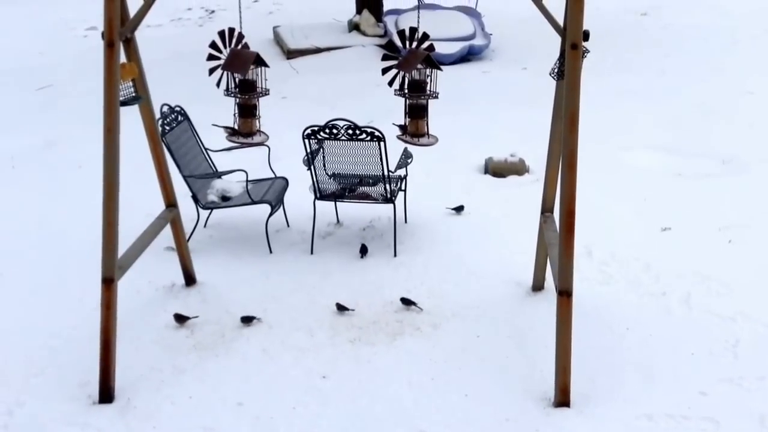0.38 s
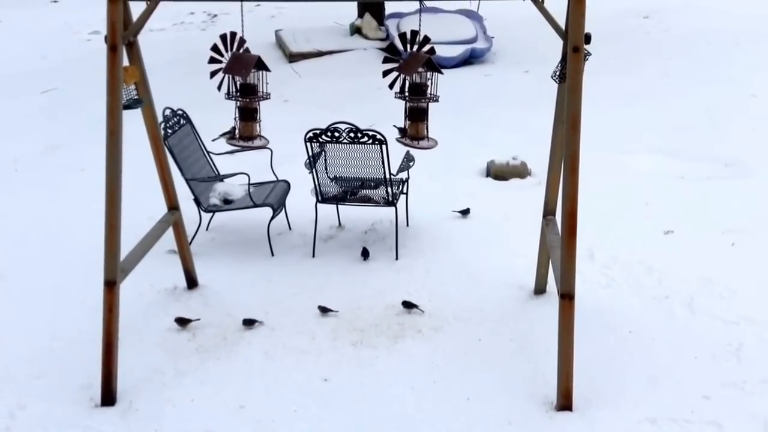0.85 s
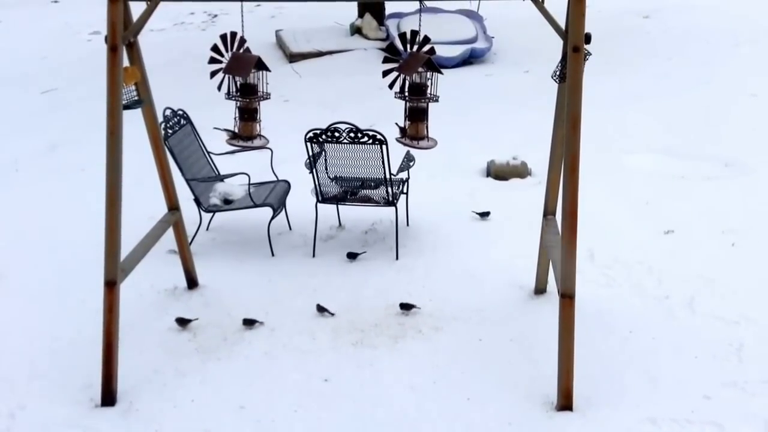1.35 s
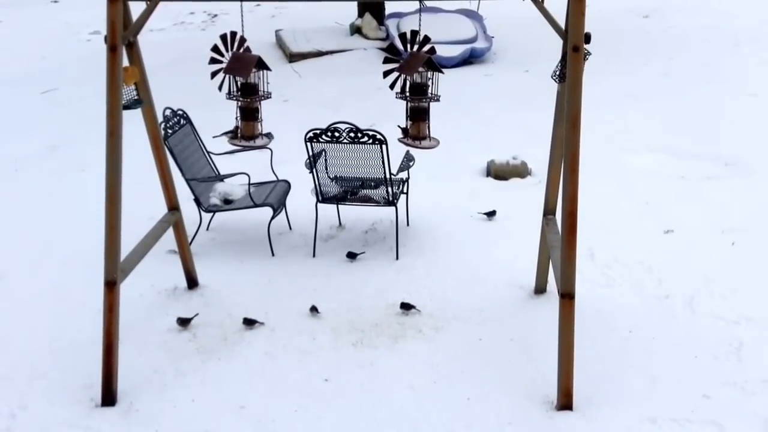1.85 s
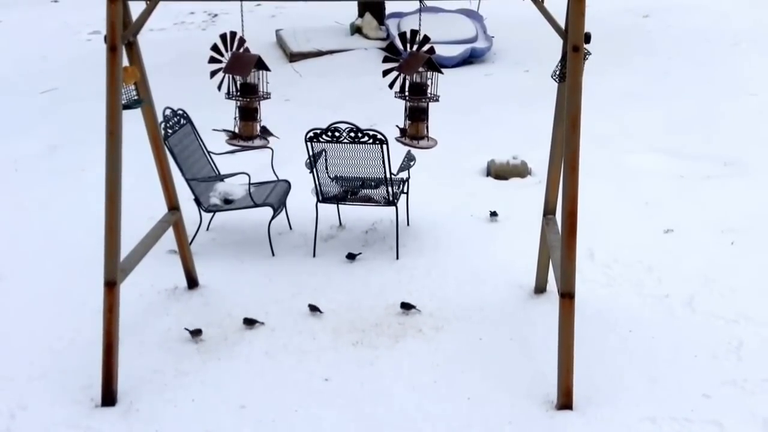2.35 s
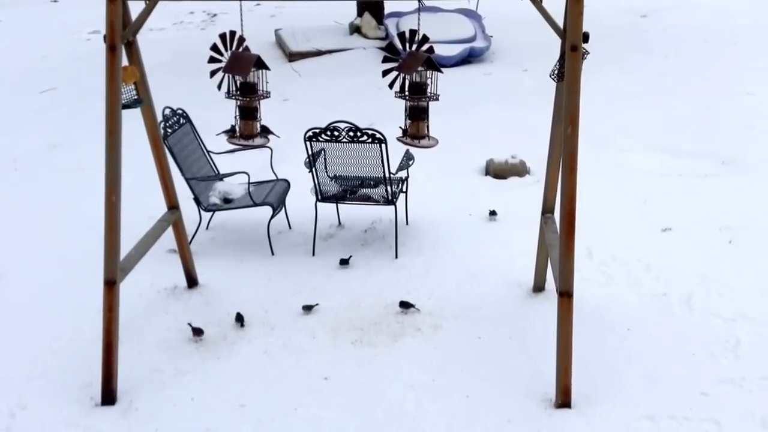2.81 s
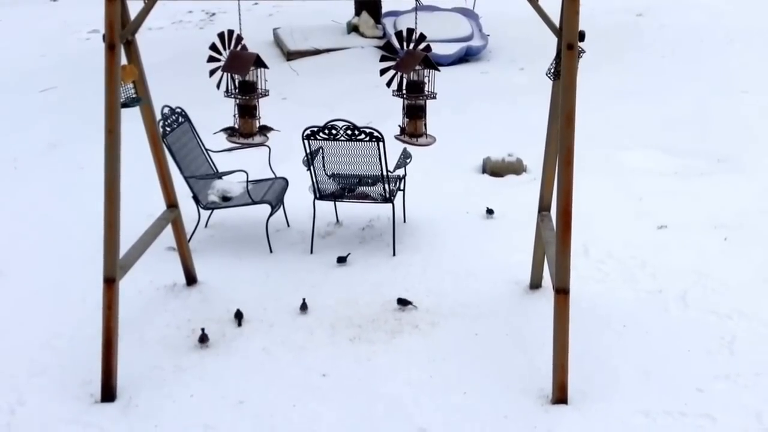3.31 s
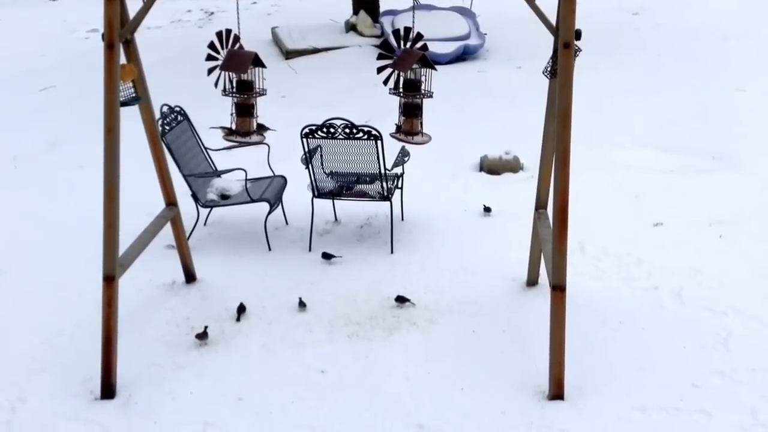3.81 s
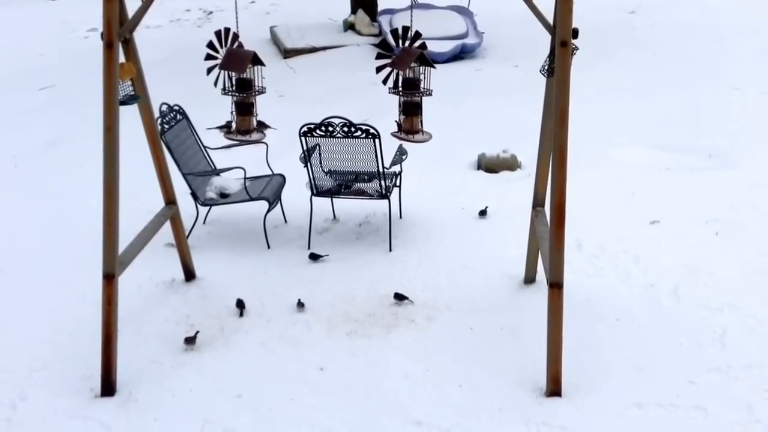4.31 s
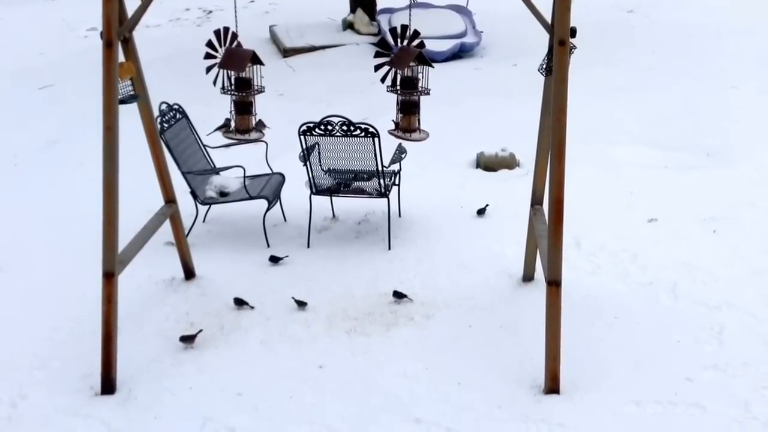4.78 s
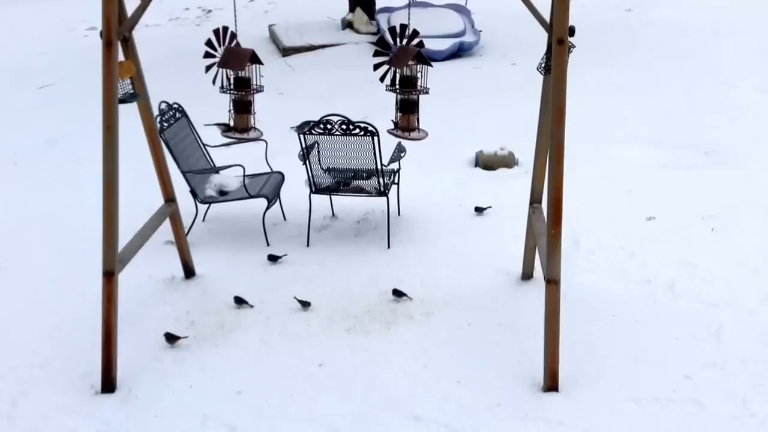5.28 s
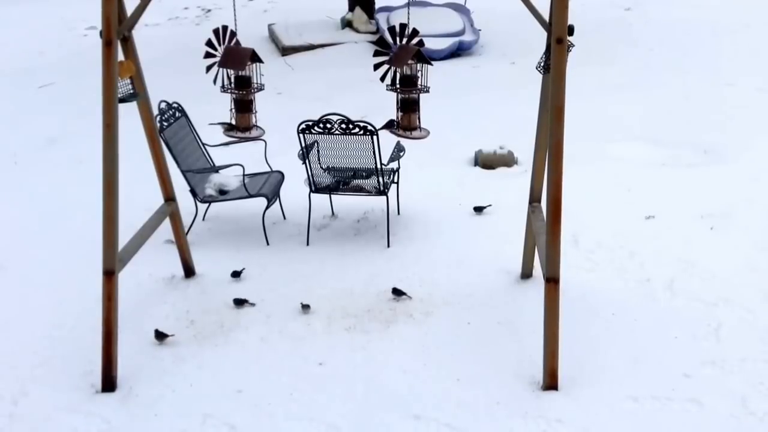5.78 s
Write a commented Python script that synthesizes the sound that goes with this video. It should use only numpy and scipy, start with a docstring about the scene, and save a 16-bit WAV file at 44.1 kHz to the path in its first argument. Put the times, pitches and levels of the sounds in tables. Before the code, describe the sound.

Outdoors in a quiet snowy yard, the tail of a bird call is heard at 0 seconds, along with a very faint fading hum. A hoarse, fowl-like bird then repeats a two-part call about every 0.7 seconds: short clucks near 0.3, 1.0, 1.6, 2.3, 3.1, 3.7, 4.4 and 5.1, each followed by a squawk of roughly a quarter second. The squawk opens low, swells into a nasal rasp and breaks into a higher register, with a dull, faint echo. A weaker cluck comes near 5.8. Another bird chirps sharply at 0.96, more softly at 4.55 and barely at 5.8; two distant soft clucks fall around 4.9. Dull bumps and small ticks close to the microphone cluster between 0.85 and 1.9, returning around 4.5 and 5.7. Faint steady hiss and low rumble continue throughout, the deepest rumble easing early.

```python
"""Fowl calling in a snowy yard

A fowl repeats a two-part call: a short cluck, then a long hoarse squawk that opens low, swells and roughens,
and breaks into a higher register. A second bird chirps three times and another clucks far off.
The voices are stacks of wavering partials, shaped by a throat colour and mixed with breath noise.
Filtered noise makes the low rumble and hiss; fading tones and noise make soft bumps close to the microphone."""
import sys
import numpy as np
from scipy import signal
from scipy.io import wavfile

SR = 44100
rng = np.random.default_rng(int(sys.argv[2]) if len(sys.argv) > 2 else 0)


def digitize_waveform(pressure):
    """Quantize a signal to 16-bit integers and store it at the path in sys.argv[1].

    Rows of a 2-D input are taken as channels; values are limited to [-1, 1].
    """
    field = np.atleast_2d(pressure).T
    bounded = np.clip(field, -1, 1)
    quanta = np.round(bounded * 32767).astype(np.int16)
    wavfile.write(sys.argv[1], SR, quanta)


def decibels_to_gain(level_db):
    """Convert a level in decibels to a linear amplitude gain (20 dB per decade)."""
    exponent = np.asarray(level_db, float) / 20
    return 10 ** exponent


N = 260190   # length of the scene in samples


def rms_one(x):
    """Scales a sound to an average (rms) level of 1."""
    return x / np.sqrt(np.mean(x ** 2) + 1e-20)


def at_hz(points, hz):
    """Reads a curve of (pitch_hz, level_db) points at any pitch, on a logarithmic pitch scale."""
    points_hz, points_db = np.transpose(points)
    return np.interp(np.log(hz), np.log(points_hz), points_db)


def drift(rate_hz, size):
    """Slow random wandering with a spread of 1: noise smoothed twice by a one-pole low-pass."""
    r = np.exp(-2 * np.pi * rate_hz / SR)
    lead = int(SR / rate_hz)   # the filter runs in first, and this part is cut off
    noise = rng.standard_normal(size + lead)
    smooth = signal.lfilter([1], [1, -2 * r, r * r], noise)
    return rms_one(smooth[lead:])


def resonance(x, hz, width_hz):
    """Lets a narrow band ring: a two-pole resonator."""
    r = np.exp(-np.pi * width_hz / SR)
    return signal.lfilter([1, 0, -1], [1, -2 * r * np.cos(2 * np.pi * hz / SR), r * r], x)


def band_pass(x, low_hz, high_hz):
    """Keeps the sound between two pitches."""
    return signal.sosfilt(signal.butter(2, [low_hz, high_hz], "band", fs=SR, output="sos"), x)


def rumble():
    """A deep, dull rumble: low noise that fades early on to a steady, slightly wandering level."""
    start_db, steady_db, fade_s = -75.5, -91.5, 0.38
    noise = band_pass(rng.standard_normal(N), 60, 98)
    settling = np.exp(-np.arange(N) / SR / fade_s)
    level_db = steady_db + (start_db - steady_db) * settling + 1.6 * drift(0.77, N)
    return decibels_to_gain(level_db) * rms_one(noise)


# tone colour of the yard's noise, before it is set to its overall level: (pitch_hz, relative level_db per Hz)
YARD_COLOUR = [(18, -62), (30, -46), (81, -39), (111, -41), (126, 0), (173, -12.5), (202, -8), (243, 20),
               (323, -49), (504, -8), (1080, -3), (1590, -10), (2070, -13.5), (2900, -13), (15400, -48)]
# narrow bands that ring faintly and steadily in the background: (pitch_hz, width_hz, level_db)
HISS_BANDS = [(146, 5.3, -74), (205.8, 18.4, -69), (242, 3.9, -72.5), (1442, 29, -67.5), (1605.4, 20, -68)]


def yard():
    """Rumble and hiss in third-octave bands that each flicker a little, a few narrow bands and a faint tone."""
    noise = np.zeros(N)
    edges_hz = 30 * 2 ** np.arange(0, 9.1, 1 / 3)
    white = rng.standard_normal((2, N))
    for k, (low_hz, high_hz) in enumerate(zip(edges_hz, edges_hz[1:])):
        band = band_pass(white[k % 2], low_hz, high_hz)   # neighbours use different noise
        level_db = at_hz(YARD_COLOUR, np.sqrt(low_hz * high_hz)) + 1.3 * drift(5, N)
        noise += decibels_to_gain(level_db) * band
    out = decibels_to_gain(-61 + 0.31 * drift(0.92, N)) * rms_one(noise)
    for hz, width_hz, level_db in HISS_BANDS:
        hiss = rms_one(resonance(rng.standard_normal(N), hz, width_hz))
        out += decibels_to_gain(level_db + 2.7 * drift(3.85, N)) * hiss
    return out + far_hum()


def far_hum():
    """A faint far tone that dies away: a sine losing a steady number of dB each second."""
    start_db, fade_db_per_s, end_s = -68, 15, 0.55
    t = np.arange(N) / SR
    tone = np.sin(2 * np.pi * 506 * t) * (t < end_s)
    return np.sqrt(2) * decibels_to_gain(start_db - fade_db_per_s * t) * tone


# soft thumps, levels before the rise and fade: (start_s, thump level_db, pitch_hz, rustle level_db)
THUMPS = [(0.857, -46.5, 159, -53), (0.888, -54, 174, -59), (1.164, -45.5, 159, -61),
          (1.408, -51.5, 157.5, -63), (1.693, -46.5, 161, -55), (1.891, -48.5, 169, -70),
          (4.45, -49, 167, -49), (4.658, -51, 167.1, -49.5), (5.747, -46.5, 179, -56.5)]
# dry ticks, levels before the fade: (start_s, level_db, pitch_hz)
DRY_TICKS = [(0.849, -53.5, 4500), (0.861, -69, 6000), (1.152, -77, 7000), (1.824, -76, 10000),
             (4.584, -67, 3400), (5.036, -73, 8000), (5.558, -74, 9000)]


def bumps():
    """Soft low thumps, each a fading tone with a rustle of noise, and dry ticks of ringing noise."""
    out = np.zeros(N + SR)
    t = np.arange(SR // 5) / SR
    for start_s, thump_db, hz, rustle_db in THUMPS:
        thump = decibels_to_gain(thump_db) * np.sin(2 * np.pi * hz * t)
        rustle = decibels_to_gain(rustle_db) * drift(1390, len(t))
        envelope = decibels_to_gain(-60 * t / 0.14) * (1 - np.exp(-t / 0.0017))   # falls 60 dB in 0.14 s
        out[round(start_s * SR):][:len(t)] += envelope * (thump + rustle)
    for start_s, level_db, hz in DRY_TICKS:
        crack = rms_one(resonance(rng.standard_normal(len(t)), hz, width_hz=3230))
        out[round(start_s * SR):][:len(t)] += decibels_to_gain(level_db - 60 * t / 0.048) * crack
    return out[:N]


def yard_echo(x):
    """Walls and trees send back a dull, scattered tail: fading noise, low-passed and convolved with the sound."""
    t60_s, level_db, cut_hz = 0.84, -24.5, 6900
    t = np.arange(SR) / SR
    tail = rng.standard_normal(SR) * decibels_to_gain(-60 * t / t60_s) * (t > .012)
    tail = signal.sosfilt(signal.butter(2, cut_hz, fs=SR, output="sos"), tail)
    tail /= np.sqrt(np.sum(tail ** 2))
    return decibels_to_gain(level_db) * signal.fftconvolve(x, tail)[:N]


def stack(f0, order, throat, stretch, jitter, uneven, breath_db):
    """Partials of a wavering pitch through the throat: the strongest one, then low, middle and top groups."""
    size = len(f0)
    waver = jitter * (1 + 3 * uneven) * drift(94, size)
    phase = np.cumsum(2 * np.pi * f0 * (1 + waver) / SR)
    k = np.arange(1, int(15000 / f0.max()) + 1)[:, None]
    centre_hz = k[:, 0] * f0.mean()
    low, top = centre_hz < 2100, centre_hz >= 6400
    middle = ~low & ~top
    low[order - 1] = False   # the strongest partial is kept apart
    # the stretch moves the resonances of the top group only
    gain = decibels_to_gain(at_hz(throat, k * f0 / np.where(top[:, None], stretch, 1)))
    # each partial swells and breaks up on its own
    wobble = np.array([drift(44.96, size) for _ in k])
    tones = np.sin(k * phase + rng.uniform(0, 2 * np.pi, k.shape))
    tones *= np.sqrt(1 - uneven ** 2) + uneven * wobble
    # breath noise rides on every partial and fills the gaps between them, more so high up
    breath = decibels_to_gain(breath_db + 2.6 * np.log2(k / order)) * np.array([drift(200, size) for _ in k])
    breath *= np.cos(k * phase + rng.uniform(0, 2.7, k.shape))
    partials = gain * (tones + breath)
    strongest = (1 + .45 * uneven * wobble[order - 1]) * np.sin(order * phase)
    low_sum, middle_sum, top_sum = [partials[group].sum(axis=0) for group in (low, middle, top)]
    return strongest, low_sum, rms_one(middle_sum), rms_one(top_sum)


# throat colour of the rasp: (pitch_hz, level_db)
RASP_COLOUR = [(400, -46.5), (800, -27), (1000, -32.5), (1400, -3), (1800, -10), (2200, -15), (2600, -33),
               (3300, -15), (4000, -30), (5000, -25.5), (5800, -26.5), (6300, -74), (7000, -31.5),
               (8200, -40.5), (10000, -39), (11000, -32.5), (12200, -51), (14000, -52)]


def add_rasp(groups, hz, elapsed_s, stretch, jitter, uneven, breath_db):
    """Forced up in pitch, the voice locks its cycles into a slower, rasping pattern of closer partials."""
    from_hz, full_hz, full_share, growth_s = 1500, 1586, 0.59, 0.11
    share = np.clip(full_share * (hz - from_hz) / (full_hz - from_hz), 0, full_share)
    share *= np.clip(elapsed_s / growth_s, 0, 1)   # it takes hold as the note goes on
    rasp = stack(hz / 8, 8, RASP_COLOUR, stretch, jitter, uneven, breath_db)[1:]
    return [np.sqrt(1 - share) * plain + np.sqrt(share) * close for plain, close in zip(groups, rasp)]


MIDDLE_DB = -45   # middle effort, around which the other partials swing


def voice(notes, throat, order, jitter, breath_db, fade_s, rough=None, rasping=False):
    """Plays notes as stacks of partials; pitch is that of the strongest partial, whose number is the order."""
    out = np.zeros(N)
    for rows in notes:
        s, *columns = np.transpose(rows)
        start, size = round(s[0] * SR), round((s[-1] - s[0]) * SR)
        t = (start + np.arange(size)) / SR
        hz, main_db, middle_db, top_db, *own = [np.interp(t, s, c) for c in columns]
        uneven = np.clip(own[0] if own else rough, 0, 1)   # some notes carry their own roughness
        stretch = own[1] / 10000 if rasping else 1   # top resonance against 10 kHz
        settings = stretch, jitter, uneven, breath_db
        strongest, *groups = stack(hz / order, order, throat, *settings)
        if rasping:
            groups = add_rasp(groups, hz, t - s[0], *settings)
        low, middle, top = groups
        # the weaker low partials follow only part of the strongest one's swell
        low_db = np.minimum(main_db + 3.0, MIDDLE_DB + 0.43 * (main_db - MIDDLE_DB))
        note = np.sqrt(2) * (decibels_to_gain(main_db) * strongest + decibels_to_gain(low_db) * low)
        note += decibels_to_gain(middle_db) * middle + decibels_to_gain(top_db) * top
        # a note at the very start of the scene has no fade-in
        edge = np.minimum(1, np.minimum(t - s[0] + (start == 0), s[-1] - t) / fade_s)
        out[start:start + size] += note * edge
    return out


def phrase(events, shape, fall_s, middle_db, top_db, middle_follow):
    """Stretches one shared shape over each note; middle and top partials follow effort, brightness and treble."""
    place, pitch, effort_db, bright_db, *own = np.transpose(shape)
    notes = []
    for start_s, rise_s, peak_db, hz, treble_db in events:
        s = start_s + rise_s + place * np.where(place < 0, rise_s, fall_s)
        main_db = peak_db + effort_db
        upper_db = main_db + treble_db
        note_middle_db = upper_db + middle_db + middle_follow * bright_db
        note_top_db = upper_db + top_db + bright_db
        notes.append(np.transpose([np.maximum(s, 0), pitch * hz, main_db, note_middle_db, note_top_db, *own]))
    return notes


# In the shapes played by phrase(), place 0 is the note's reference point, -1 is one rise_s before it and
# 1 is one fall_s after it; a shape may start, peak or end nearby. Pitch multiplies the note's pitch,
# effort_db adds to its level_db, and brightness_db is how far the beak opens.

# soft fading clucks far off: (start_s, rise_s, level_db, 4th partial pitch_hz, treble_db)
DISTANT_CLUCKS = [(4.875, 0.02945, -51, 1228, -3), (4.955, .018, -58.5, 1053, .1)]
# their shared shape, whose pitch dips and recovers: (place, pitch, effort_db, brightness_db)
DISTANT_SHAPE = [(-1.2, .95, -3, 0), (0.0025, 1.001, -3.5, 0), (0.515, 0.75, -5, 0), (0.96, 0.96, -7, 0)]
# throat colour of the far clucks and of the squawk's opening: (pitch_hz, level_db)
OPENING_COLOUR = [(300, -62), (900, -32), (1200, 7), (1500, -53), (2700, -35), (3700, -8.5), (4200, -20),
                  (4800, -8), (5600, -38), (6400, -42), (10000, -31), (14500, -59)]


def far_clucks():
    """Another fowl's soft clucks, with partials around a strong fourth one."""
    notes = phrase(DISTANT_CLUCKS, DISTANT_SHAPE, fall_s=.032, middle_db=-20, top_db=-33, middle_follow=0)
    return voice(notes, OPENING_COLOUR, order=4, jitter=.003, rough=.5, breath_db=-13, fade_s=.012)


# second bird: (start_s, rise_s, level_db before the steeper swell, 2nd partial pitch_hz, treble_db)
CHIRP_NOTES = [(.96, 0.023, -41.5, 2860, .1), (4.548, 0.015, -50, 2940, 2), (5.785, 0.014, -68, 2950, .1)]
# shared shape: (place, pitch, effort_db before the steeper swell, brightness_db,
# roughness from 0 to 1 before the change for softness)
CHIRP_COURSE = [(-1, .9, -28, -6, .1), (-0.66, .92, -5, -5, .2), (-0.5, 1.001, -7, -10, 0.12),
                (0.12, 1.002, 2, 1.5, .1), (.45, 1.005, -9.5, -1, 0.45), (1, 1.01, -9, -4, .55)]
# throat colour of the second bird: (pitch_hz, level_db)
CHIRP_COLOUR = [(1440, 1), (2500, -2.5), (2880, 2.5), (4320, -2), (5760, -39), (7200, -10), (8640, -2),
                (11500, -29), (14400, -28)]


def second_bird():
    """Chirps around a strong second partial, scratchier when softer."""
    notes = phrase(CHIRP_NOTES, CHIRP_COURSE, fall_s=.027, middle_db=0.5, top_db=-22, middle_follow=.1)
    first_level_db = CHIRP_NOTES[0][2]
    for note in notes:
        note[:, 5] += .05 * (first_level_db - note[:, 2].max())   # roughness per dB
        # steeper swell: the strongest partial's level moves more than that of the bright ones
        note[:, 2] += -3 + 0.65 * (note[:, 2] - MIDDLE_DB)
    return voice(notes, CHIRP_COLOUR, order=2, jitter=0.0024, breath_db=-4.5, fade_s=0.0047)


# short clucks: (start_s, rise_s, level_db, 4th partial pitch_hz, treble_db)
CLUCK_NOTES = [(.3, 0.041, -45.5, 1210, -0.5), (.985, .018, -46, 1190, 3), (1.645, 0.027, -45.5, 1178, 1),
               (2.345, 0.035, -43.5, 1166, -1), (3.06, 0.027, -44.5, 1159, -1.5),
               (3.725, 0.031, -42.5, 1148, 0), (4.415, 0.032, -41, 1152, 2.5),
               (5.125, 0.028, -46, 1206, 0.5), (5.78, 0.036, -55, 1123, 0)]
# their shared shape: (place, pitch, effort_db, brightness_db)
CLUCK_COURSE = [(-1, .97, -13, -6), (-0.44, 1.02, -7.5, 6.5), (0.061, 1.001, 1, -2),
                (0.38, .99, -10.5, -1.5), (1, 0.68, -26.5, 4)]
# throat colour of the cluck: (pitch_hz, level_db)
CLUCK_COLOUR = [(300, -52), (600, -52), (890, -12), (1160, -2.5), (1480, -5), (1800, -19), (2300, -19),
                (2750, -14.5), (3300, -15), (3900, -24), (4750, -16.5), (5500, -31), (6400, -58.5),
                (9500, -42), (12000, -50), (14500, -59)]


def clucks():
    """The short first part of the call: rough partials around a strong fourth one."""
    notes = phrase(CLUCK_NOTES, CLUCK_COURSE, fall_s=.036, middle_db=-11.5, top_db=-30.5, middle_follow=0.95)
    return voice(notes, CLUCK_COLOUR, order=4, jitter=.004, rough=.7, breath_db=-9, fade_s=.008)


# narrow-beaked openings of the squawk: (start_s, rise_s, level_db, 4th partial pitch_hz, treble_db)
OPENING_NOTES = [(.49, .027, -44, 1250, -3), (1.14, 0.034, -44.5, 1258, 6), (1.805, 0.04, -45, 1241, 5),
                 (2.5, 0.053, -44.5, 1200, 0.5), (3.218, 0.056, -40, 1242, 0),
                 (3.88, 0.046, -42.5, 1228, 4), (4.585, 0.021, -41, 1192, -3),
                 (5.285, 0.063, -38.5, 1261, -5)]
# their shared shape: (place, pitch, effort_db, brightness_db)
OPENING_COURSE = [(-1, 0.84, -17, -6), (-0.69, .93, -7.5, -6), (-.35, .96, -9.5, -4),
                  (-0.053, 1.001, 0, -4.5), (.5, 1.005, -4, 4), (0.89, 1.5, -8.5, 15)]


def squawk_openings():
    """The low start of the squawk, with a strong fourth partial."""
    notes = phrase(OPENING_NOTES, OPENING_COURSE, fall_s=.036, middle_db=-15.5, top_db=-34, middle_follow=0.83)
    return voice(notes, OPENING_COLOUR, order=4, jitter=.003, rough=.5, breath_db=-13, fade_s=.012)


# full-voice squawks, one effort curve a call: (time_s, 5th partial level_db)
SQUAWK_EFFORTS = [
    [(0.52, -55), (0.544, -42), (0.578, -36.5), (0.666, -42), (0.7, -55)],
    [(1.18, -57), (1.21, -44.5), (1.26, -32.5), (1.312, -32.5), (1.332, -39), (1.355, -51)],
    [(1.845, -58), (1.865, -47), (1.911, -34), (1.947, -39.5), (1.981, -33), (2.007, -39), (2.03, -56)],
    [(2.56, -61), (2.574, -51), (2.618, -38), (2.688, -32.5), (2.735, -51.5)],
    [(3.27, -55), (3.284, -48.5), (3.342, -32), (3.4, -36.5), (3.43, -54)],
    [(3.93, -54), (3.972, -36), (3.998, -31.5), (4.036, -37), (4.066, -34.5), (4.086, -40), (4.105, -52)],
    [(4.63, -59), (4.642, -51), (4.704, -33), (4.726, -32), (4.748, -34.5), (4.774, -50), (4.79, -53)],
    [(5.338, -55), (5.352, -45.5), (5.392, -33), (5.47, -35), (5.5, -51)],
]
# how far each call is aimed at the microphone, before its share along the call: one treble_db a call
SQUAWK_AIM = [-2.2, -1.5, -0.5, 0.3, -1, 1.5, -4.5, 5.5]
# shared course: (share of length, 5th partial pitch_hz, brightness_db, roughness from 0 to 1,
# top resonance pitch_hz before the lift for brighter calls)
SQUAWK_COURSE = [(0, 1495, -10, 0.48, 8600), (.15, 1515, 0, 0.56, 9480), (.35, 1563, 1.5, 0.56, 9000),
                 (.55, 1603, 1, 0.57, 9500), (.72, 1605, -2.5, 0.86, 9790), (.87, 1605, -9.5, .5, 10100),
                 (0.99, 1539, -20, .55, 10000)]


def squawk_notes():
    """Effort comes from each call's curve; pitch, beak opening, roughness and resonance from the shared course."""
    share, *course = np.transpose(SQUAWK_COURSE)
    notes = []
    for rows, aim_db in zip(SQUAWK_EFFORTS, SQUAWK_AIM):
        at_s, effort_db = np.transpose(rows)
        s = np.linspace(at_s[0], at_s[-1], num=25)
        along = (s - s[0]) / (s[-1] - s[0])
        hz, bright_db, rough, top_hz = [np.interp(along, share, c) for c in course]
        main_db = np.interp(s, at_s, effort_db)
        treble_db = aim_db * (0.29 + 1.16 * along)   # the aim counts more towards the end
        swing_db = 0.29 * (main_db - MIDDLE_DB)
        # brightness and aim change the middle partials less than the top ones
        middle_db = -52 + swing_db + 0.48 * bright_db + 0.24 * treble_db
        top_db = -66 + swing_db + bright_db + treble_db
        top_hz = top_hz * (1 + .004 * treble_db)   # a brighter squawk lifts its top resonance
        notes.append(np.transpose([s, hz, main_db, middle_db, top_db, rough, top_hz]))
    return notes


# throat colour of the full-voice squawk: (pitch_hz, level_db)
SQUAWK_COLOUR = [(300, -61), (630, -39.5), (930, -15), (1250, -12.5), (1580, -5), (1870, -16),
                 (2200, -26.5), (3100, -26.5), (3600, -36), (4100, -27.5), (5100, -22), (5800, -35),
                 (6300, -75), (7000, -55), (8200, -48.5), (10000, -30), (11000, -28.5), (12200, -64),
                 (14000, -50)]


def squawks():
    """The hoarse full voice: a strong fifth partial, the others partly giving way to a rasp at high pitch."""
    return voice(squawk_notes(), SQUAWK_COLOUR, order=5, jitter=.003, breath_db=-13, fade_s=.005, rasping=True)


# breaks into the high register: (start_s, rise_s, level_db, 3rd partial pitch_hz, treble_db)
BREAK_NOTES = [(0, .003, -47, 1450, -2.5), (.635, .036, -35, 1443, 0), (1.3, 0.019, -36, 1456, 0.5),
               (1.95, 0.029, -34.5, 1460, .1), (2.675, 0.026, -37, 1456, 0.5),
               (3.37, 0.018, -33.5, 1437, -1.5), (4.04, 0.027, -32.5, 1450, -0.7),
               (4.735, 0.025, -34.5, 1451, 0.2), (5.425, 0.039, -34.5, 1435, 1.5)]
# their shared shape: (place, pitch, effort_db, brightness_db)
BREAK_COURSE = [(-1, 1.01, -4.5, -2), (-0.056, 1.001, 0.5, -4.5), (0.17, 1.002, -7, 4),
                (0.59, 1.005, -10.5, 3.5), (0.95, 1.01, -28, 12)]
# throat colour of the break: (pitch_hz, level_db)
BREAK_COLOUR = [(480, -66), (970, -55), (1450, 5), (1940, -19), (2430, -19), (2900, -6.5), (4300, -28),
                (6300, -33.5), (10000, -39), (14000, -54)]


def squawk_breaks():
    """The end of the squawk in a higher register: wider-spaced partials with a strong third one."""
    notes = phrase(BREAK_NOTES, BREAK_COURSE, fall_s=0.063, middle_db=-13.5, top_db=-30.5, middle_follow=.1)
    return voice(notes, BREAK_COLOUR, order=3, jitter=.003, rough=.5, breath_db=-10, fade_s=.02)


def scene():
    """Mixes the birds, their echo, the yard and the bumps, drops their bass and adds the deep rumble."""
    fowl = clucks() + squawk_openings() + squawks() + squawk_breaks()
    birds = fowl + far_clucks()
    second = second_bird()
    # the second bird sits in the open and stirs less echo
    echo = yard_echo(birds + 0.51 * second)
    mix = birds + second + echo + yard() + bumps()
    # the microphone drops the bass of airborne sound; the deep rumble joins after this
    mix = signal.sosfilt(signal.butter(4, 121, "high", fs=SR, output="sos"), mix)
    return (mix + rumble())[None]


def band_limit(x):
    """A steep low-pass at the top of the band."""
    return signal.sosfilt(signal.butter(12, 15590, fs=SR, output="sos"), x)


def record(dry):
    """Turns the finished mix into the final sound."""
    return band_limit(dry)


dry = scene()
out = record(dry)
digitize_waveform(out)
```